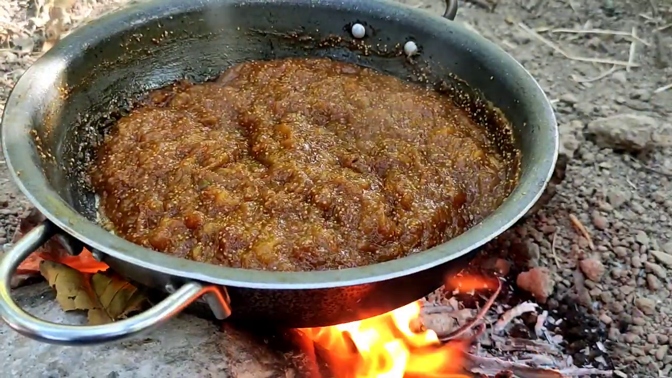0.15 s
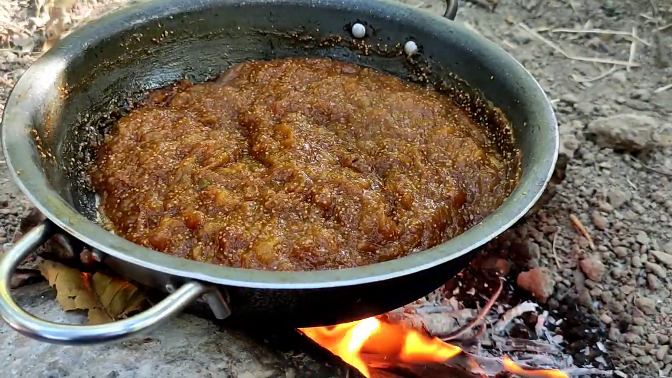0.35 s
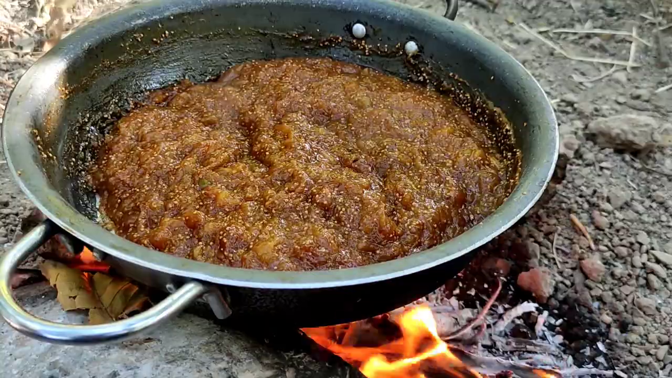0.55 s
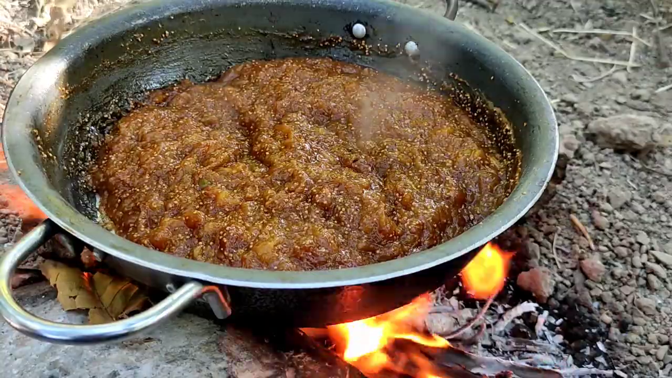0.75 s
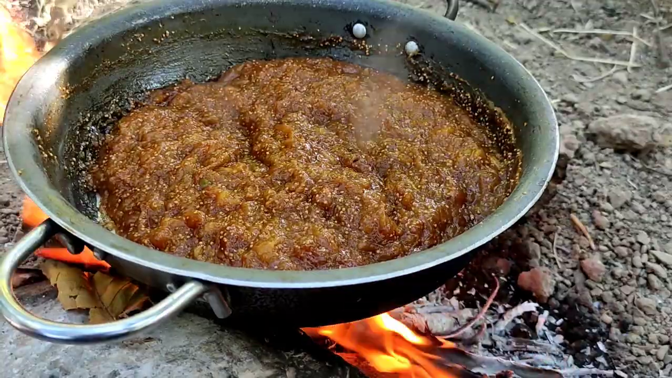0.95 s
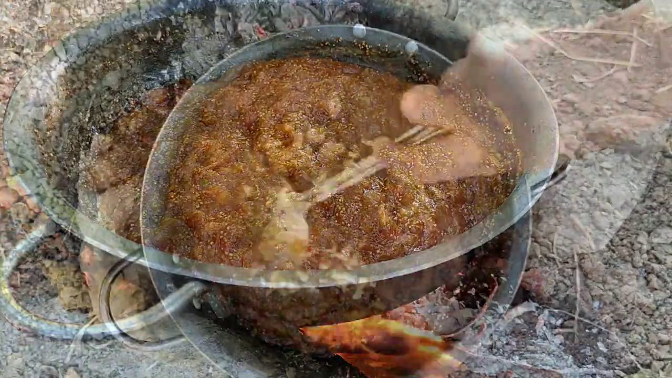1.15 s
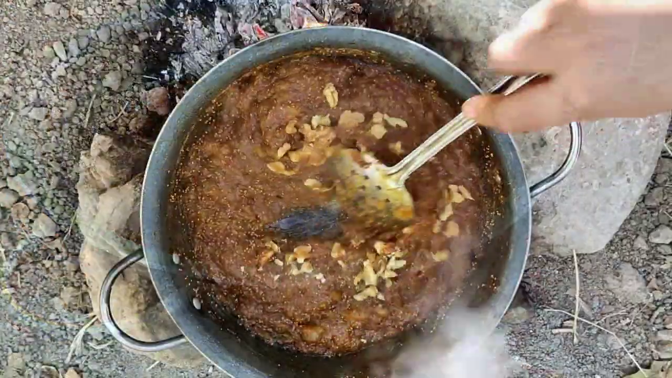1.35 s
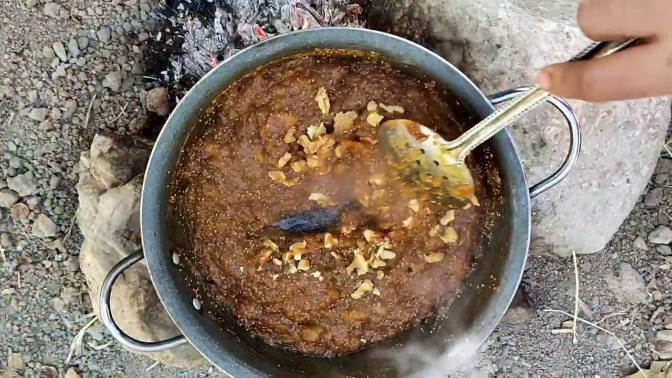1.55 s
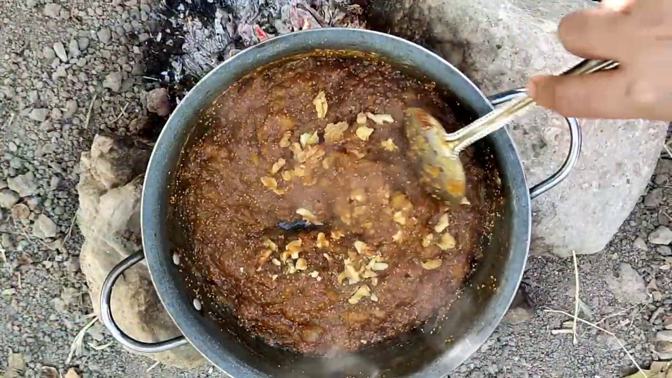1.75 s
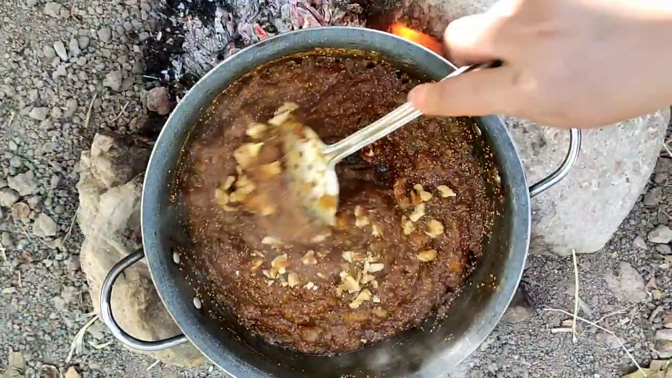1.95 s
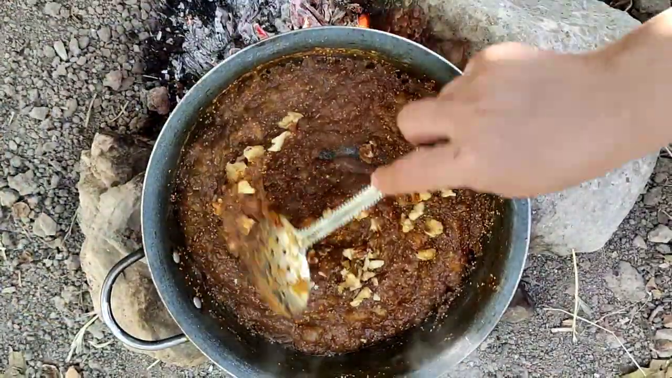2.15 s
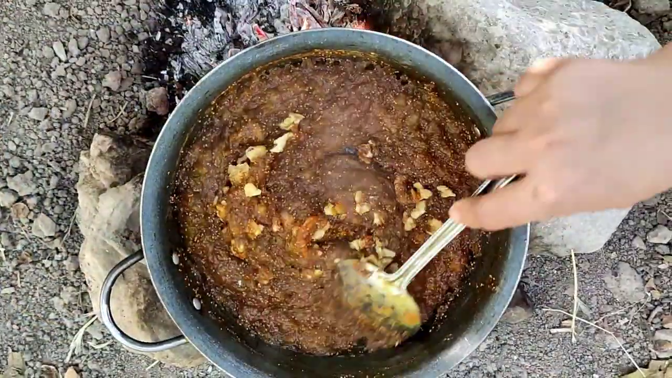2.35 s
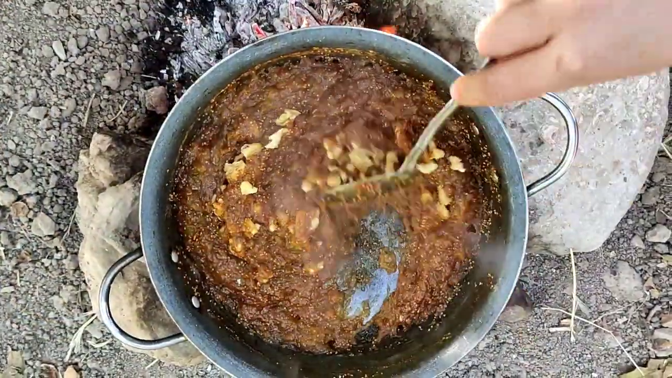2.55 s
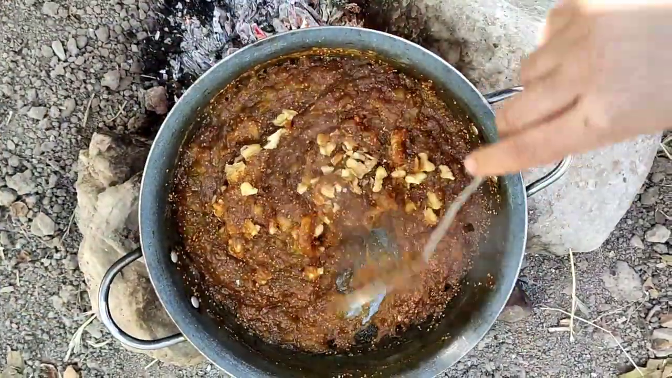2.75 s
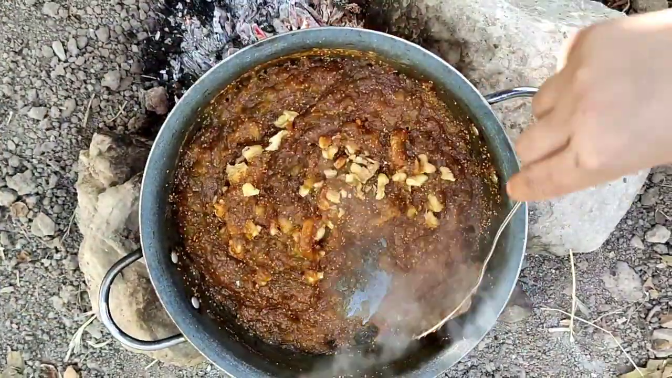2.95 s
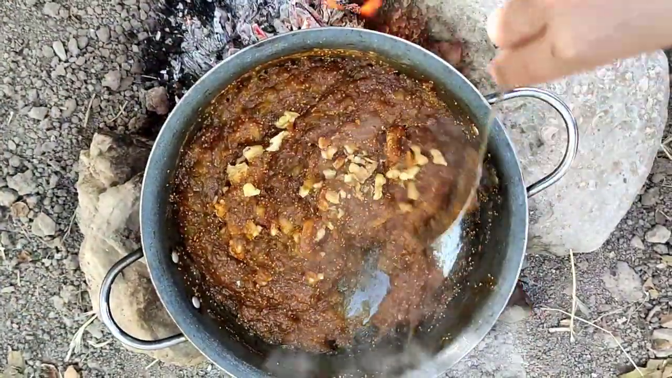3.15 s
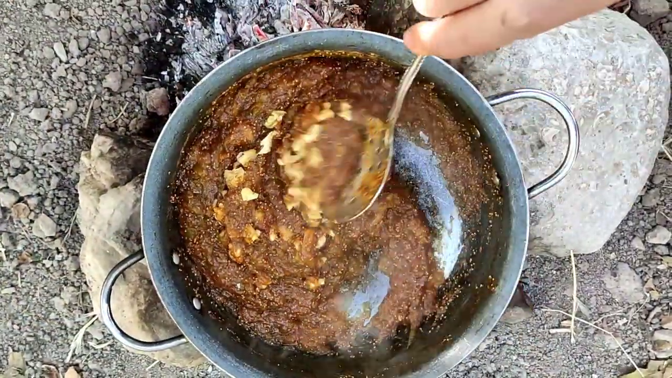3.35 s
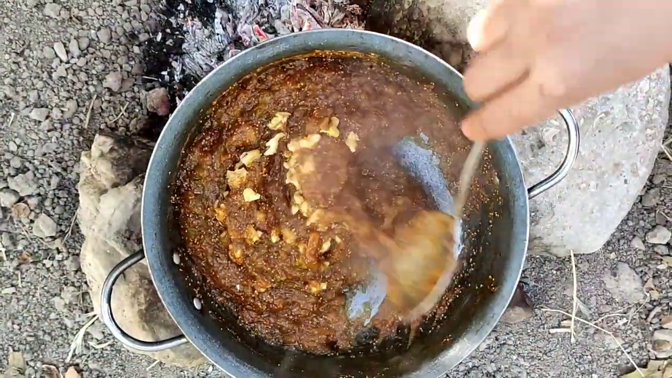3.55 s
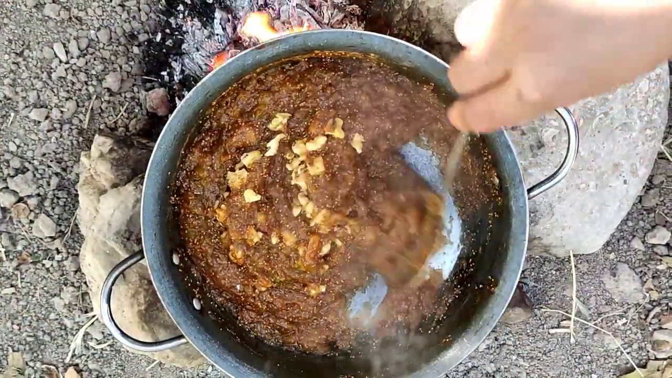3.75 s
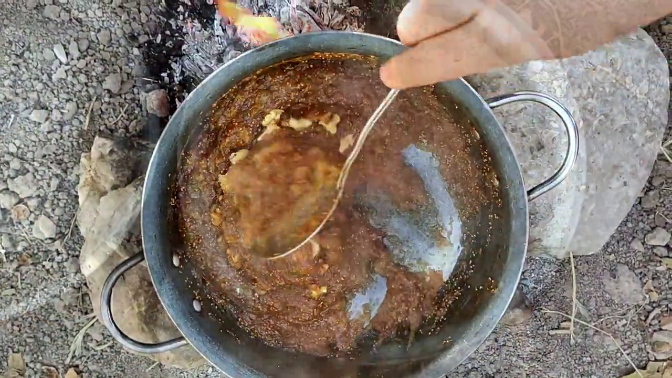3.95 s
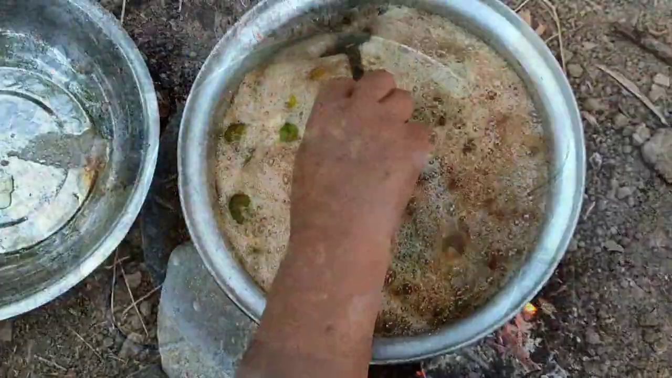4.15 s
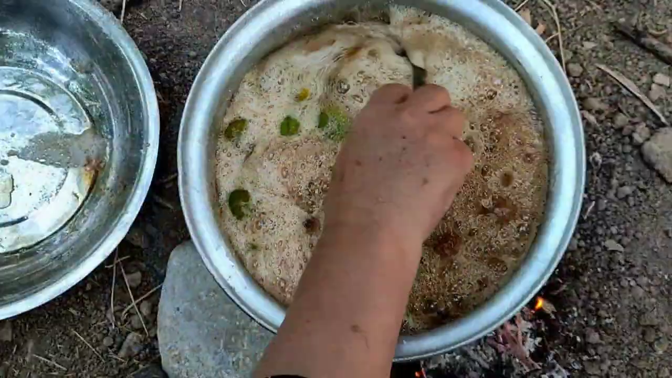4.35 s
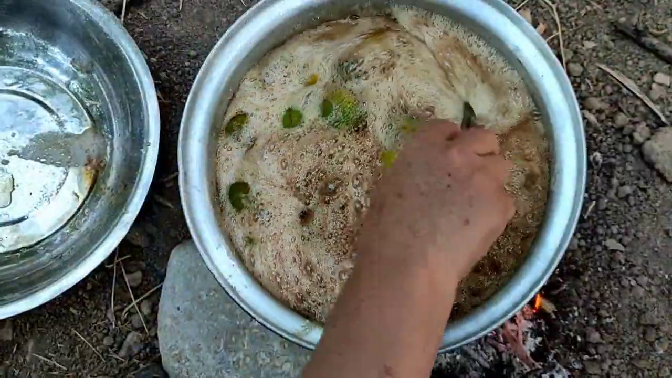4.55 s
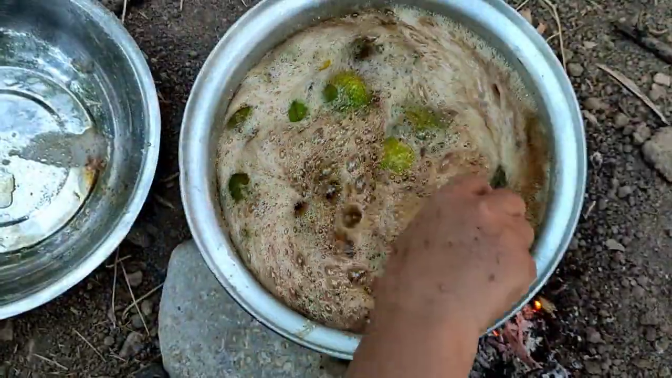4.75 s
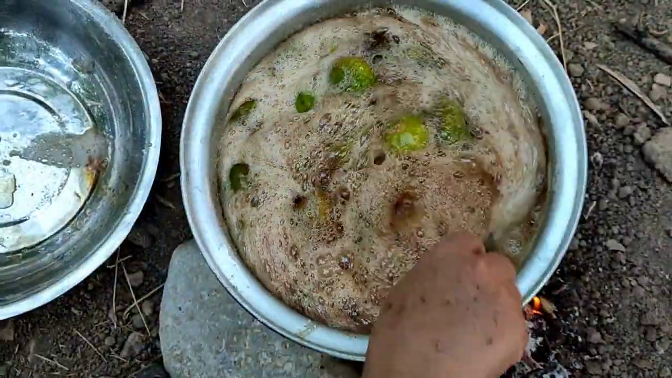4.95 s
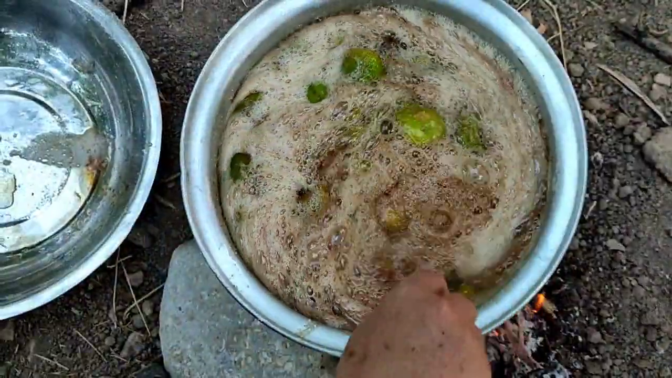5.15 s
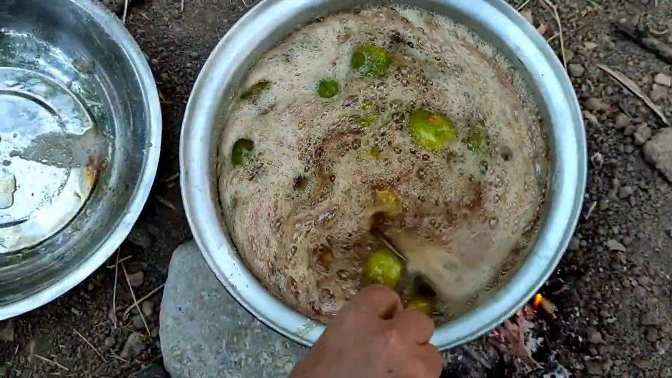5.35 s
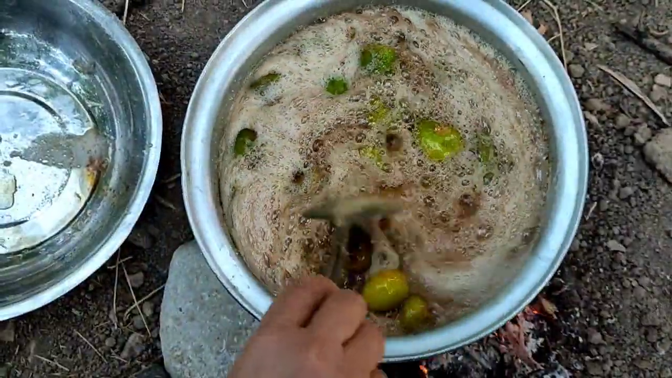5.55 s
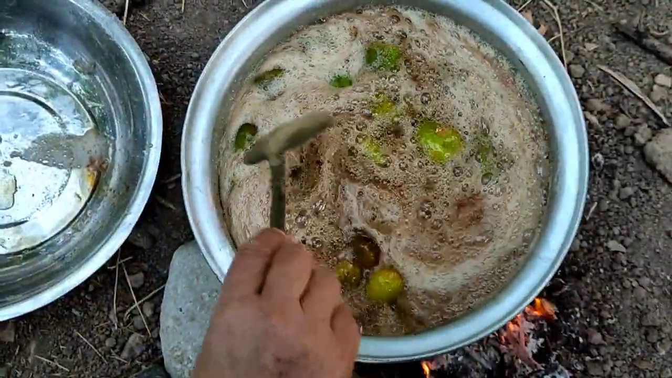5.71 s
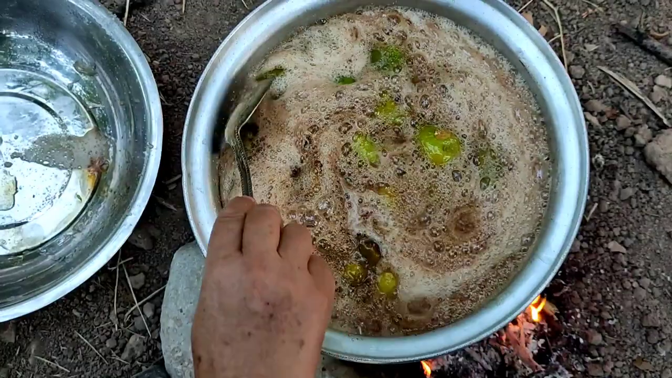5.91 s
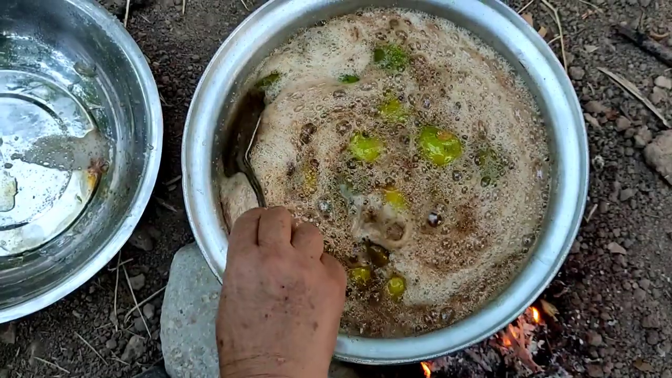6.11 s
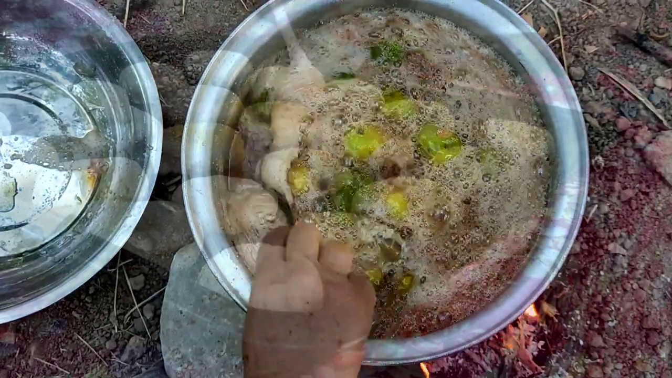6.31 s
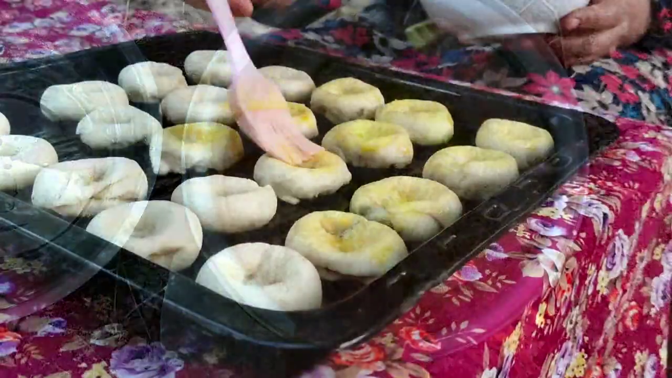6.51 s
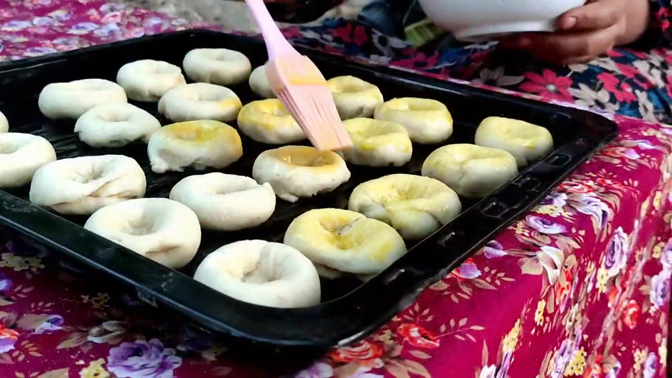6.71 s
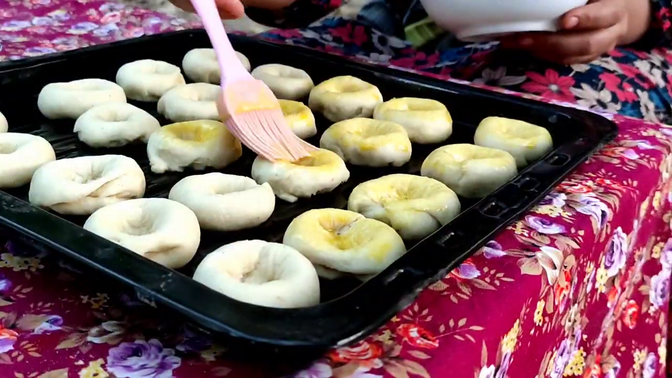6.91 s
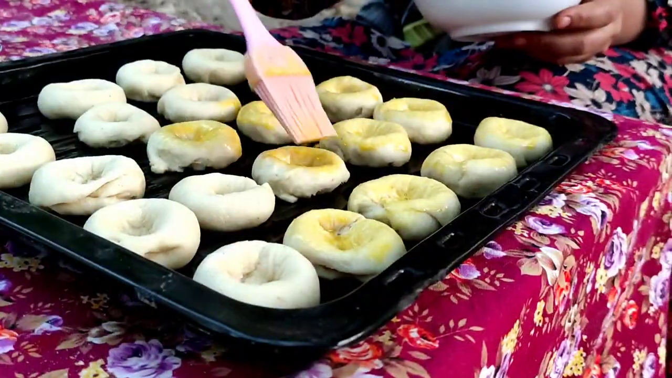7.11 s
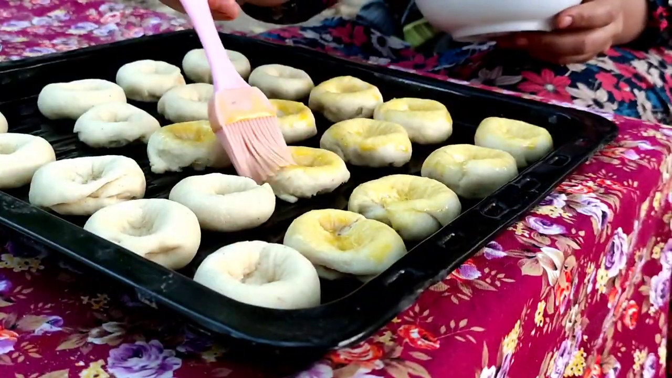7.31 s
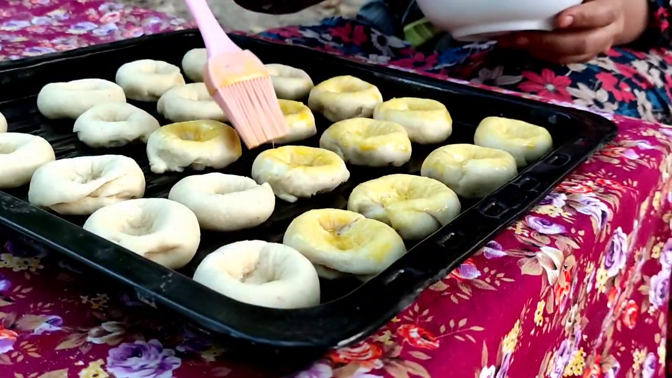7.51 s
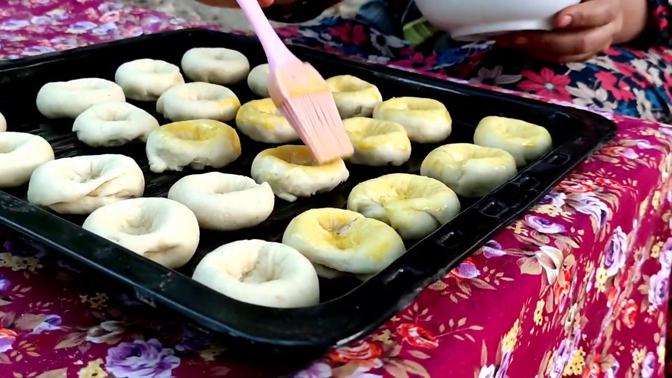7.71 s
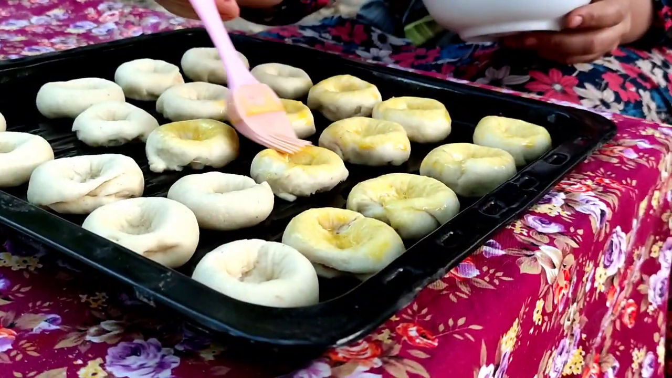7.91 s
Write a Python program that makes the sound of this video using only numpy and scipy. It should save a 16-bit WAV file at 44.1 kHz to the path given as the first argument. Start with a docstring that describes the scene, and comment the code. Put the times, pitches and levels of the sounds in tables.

```python
"""Cooking outdoors over a fluttering wood fire. First, thick jam simmers in a steel pan: it bubbles, plops
and lets off steam while embers crackle. From about 1.2 s it sizzles on the bared metal as a
metal spoon scrapes, knocks and groans through it. From about 4.2 s the spoon stirs a foaming pot of
syrup, rasping and clinking on its wall. From about 6.5 s a soft brush dabs dough on a tray."""
import sys
import numpy as np
from scipy import signal
from scipy.fft import rfft, irfft
from scipy.io import wavfile
from scipy.ndimage import uniform_filter1d, map_coordinates

SR = 44100
rng = np.random.default_rng(int(sys.argv[2]) if len(sys.argv) > 2 else 0)


def unload_wav(signal):
    """Save mono or channel-first audio to the path in sys.argv[1] as 16-bit WAV at rate SR, clipped to [-1, 1]."""
    wavfile.write(
        sys.argv[1],
        SR,
        np.round(np.clip(np.atleast_2d(signal).T, -1, 1) * 32767).astype(np.int16),
    )


N = 355887
TIME = np.arange(N) / SR

# when each job is heard: (start [s], fade-in [s], start of fade-out [s], fade-out [s])
STIRRING = (1.18, 0.22, 3.903, 0.59)
BOILING = (4.15, 0.28, 6.376, 0.31)
BRUSHING = (6.45, 0.097, 8.1, 0.1)
# the pan's modes (its natural notes), damped by the jam: (pitch [Hz], level [dB], ring time [s])
PAN_MODES = [(246, -40.5, 0.13), (371, -13, 0.045), (634, -1, 0.021), (720, -11, 0.043),
             (1065, -19.5, 0.0311), (1287, -11, 0.032), (1600, -31, 0.078)]


def from_db(db):
    """Turn decibels into a factor to multiply by."""
    return 10 ** (np.asarray(db) / 20)


def rms_one(x):
    """Scale a sound so that the average of its channels has an rms (typical size) of 1."""
    return x / np.sqrt(np.mean(np.atleast_2d(x).mean(axis=0) ** 2) + 1e-20)


def at_hz(points, size=4096):
    """Join (frequency, value) points on a log axis and read them at evenly spaced frequencies."""
    hz, value = np.transpose(points)
    return np.interp(np.log(np.linspace(1, SR / 2, size + 1)), np.log(hz), value)


def shape(x, gain):
    """Give each frequency its own gain, with no echo ahead of the sound (a minimum-phase filter)."""
    cepstrum = irfft(np.log(gain + 1e-6))
    half = len(gain) - 1
    cepstrum[1:half] *= 2
    cepstrum[half + 1:] = 0
    response = irfft(np.exp(rfft(cepstrum)))[:half]
    return signal.oaconvolve(np.atleast_2d(x), response[None], axes=1)[:, :N]


def colour(x, spectrum):
    """Set a sound's tone colour from (frequency [Hz], level [dB]) points."""
    return shape(x, from_db(at_hz(spectrum)))


def low_pass(x, hz):
    """Muffle everything above the cut-off frequency."""
    return signal.sosfilt(signal.butter(2, min(hz, .45 * SR), fs=SR, output="sos"), x + 1e-18)


def drift(rate):
    """A curve that glides to a new random value, about 1 in size, `rate` times a second."""
    return np.interp(TIME * rate, np.arange(4000), rng.standard_normal(4000))


def held(start, attack, end, release):
    """A gain that rises from the start, holds at 1 until the end and then falls away."""
    return np.clip(np.minimum((TIME - start) / attack, 1 - (TIME - end) / release), 0, 1)


def spread(pair):
    """Two unrelated signals become stereo, alike in the bass and apart in the treble."""
    # how alike left and right are: (frequency [Hz], likeness [1 = the same])
    likeness = [(50, 0.5), (130, 0.74), (300, 0.72), (700, 0.86), (1400, 0.3), (2800, 0.11), (6000, -0.02),
                (15000, 0)]
    alike = np.clip(at_hz(likeness), -.98, .98)
    middle = shape(pair[0], np.ones_like(alike))
    side = shape(pair[1], np.sqrt((1 - alike) / (1 + alike)))
    return middle + side * [[1], [-1]]


def pan(x, db):
    """Place a sound to the left (positive dB) or right."""
    return x * from_db(np.array([[db], [-db]]) / 2)


def lean(x, side):
    """Share each frequency between left and right."""
    tilt = from_db(at_hz(side))
    right = np.sqrt(2 / (1 + tilt ** 2))
    return np.vstack([shape(x[0], right * tilt), shape(x[1], right)])


def grains(per_s, size_db):
    """Tiny random pops of uneven size, as two unrelated signals."""
    sizes = from_db(size_db * np.minimum(rng.exponential(1, N), 4.5))
    pops = rng.standard_normal((2, N)) * sizes * (rng.random(N) < per_s / SR)
    return pops / (pops.std() + 1e-12)


def hiss(spectrum, grain_db, per_s, size_db, flicker_db, flicker_rate):
    """Countless small pops merge into flickering noise, with nearer ones standing out."""
    source = rng.standard_normal((2, N)) + from_db(grain_db) * grains(per_s, size_db)
    flicker = from_db(flicker_db * drift(flicker_rate))
    return rms_one(colour(spread(source * flicker), spectrum))


def taps(times, db):
    """One tap, a single sample long, at each given time."""
    out = np.zeros(N)
    np.add.at(out, np.round(np.atleast_1d(times) * SR).astype(int), from_db(db))
    return out


def at_random(per_s, db):
    """Taps at random moments."""
    return from_db(db) * (rng.random(N) < per_s / SR)


def ring(force, hz, t60):
    """A force sets one note ringing; t60 is its ring time, the seconds it takes to fade by 60 dB."""
    decay = from_db(-60 / (t60 * SR))
    angle = 2 * np.pi * hz / SR
    return signal.lfilter([.5, 0, -.5], [1, -2 * decay * np.cos(angle), decay * decay], force + 1e-18)


def body(force, modes, pitch=1, tilt_db=0):
    """An object rings in all its modes; the spot that is hit shifts their pitch and balance."""
    pivot_hz = 700
    return sum(from_db(db + tilt_db * np.log2(hz / pivot_hz)) * ring(force, hz * pitch, t60)
               for hz, db, t60 in modes)


def scatter(x, t60, db):
    """Many tiny echoes that die away, different on the left and right."""
    t = TIME[:SR // 3]
    tail = rng.standard_normal((2, len(t))) * from_db(-60 * t / t60)
    tail *= from_db(db) / np.sqrt(np.sum(tail ** 2, axis=1, keepdims=True))
    return signal.oaconvolve(np.atleast_2d(x), tail, axes=1)[:, :N]


def fire(change_s=0.21):
    """Fluttering flames and low outdoor rumble move from one level to the next."""
    # steps in the fire's strength: (start [s], level [dB])
    steps = [(0, -64.5), (0.5, -63.5), (1.0, -67.5), (3.6, -62), (4.15, -69.5), (4.602, -62), (6.52, -70)]
    # the rumble's tone: (frequency [Hz], level [dB])
    tone = [(15, -63), (25, -36.5), (45, -18), (97, 4), (233, 0.5), (339, 1), (403, -7), (479, -8.5),
            (600, -9), (780, -42), (1320, -120)]
    times, db = np.transpose(steps)
    stepped_db = db[np.searchsorted(times[1:], TIME)]
    level = from_db(5 + uniform_filter1d(stepped_db, int(change_s * SR)))
    return level * hiss(tone, grain_db=-7, per_s=100, size_db=2, flicker_db=3, flicker_rate=20)


def simmering_jam():
    """The resting jam bubbles finely and lets off thin jets of steam."""
    # jets of steam: (start [s], end [s], level [dB])
    jets = [(-0.1, 0.242, -56.5), (0.547, 0.78, -55.5), (0.966, 1.15, -57.5)]
    # the bubbles' tone: (frequency [Hz], level [dB])
    bubble_tone = [(210, -11.5), (350, -0.5), (482, -20), (575, -2.5), (754, -1), (1240, -7), (1500, -1),
                   (1680, -11.5), (3560, -10), (5060, -12.5), (5390, -15.5), (6530, -11.5), (7190, -17),
                   (10700, -17.5), (16000, -33)]
    # the steam's tone: (frequency [Hz], level [dB])
    steam_tone = [(5000, -10), (6500, -1.5), (8000, -25), (9500, -6.5), (10700, 2), (12000, -7),
                  (14000, -13), (16000, -24)]
    simmer = from_db(-53) * held(start=-0.1, attack=0.05, end=0.98, release=0.54)
    puffs = sum(from_db(db - 1.5) * held(start, 0.052, end, 0.087) for start, end, db in jets)
    bubbles = hiss(bubble_tone, grain_db=-10.5, per_s=1000, size_db=-2.5, flicker_db=1, flicker_rate=24.8)
    steam = hiss(steam_tone, grain_db=-5, per_s=940, size_db=1.5, flicker_db=3, flicker_rate=50)
    return pan(simmer * bubbles + puffs * steam, db=-2)


def plops(small_per_s=8, low_hz=85.4, high_hz=335, count=6):
    """Each plop in the hot food is a low note that dies within a few cycles."""
    # loud plops of jam and a dab of the brush: (time [s], level [dB], pitch [Hz])
    loud_plops = [(0.393, -40, 197), (0.562, -47.5, 88.8), (0.708, -50, 78), (0.893, -50, 105),
                  (1.762, -44, 176), (2.133, -38.5, 233), (2.601, -42, 237), (2.899, -40.5, 250),
                  (3.219, -34, 336), (3.396, -43, 136), (3.903, -42.5, 122), (7.604, -43, 140)]
    cooking = 1 - held(*BRUSHING)
    loud = [(taps(s, db), hz) for s, db, hz in loud_plops]
    small = [(cooking * at_random(small_per_s / count, db=-49.5), hz)
             for hz in np.geomspace(low_hz, high_hz, count)]
    notes = sum(ring(force, hz, t60=4.7 / hz) for force, hz in loud + small)
    return from_db(4) * low_pass(notes, hz=453)


def crackles():
    """Embers and bursting bubbles snap and echo off nearby stones; faint snaps join as the pot boils."""
    # the loud snaps: (time [s], level [dB])
    loud_snaps = [(0.6804, -18.5), (1.018, -35), (1.105, -27.5), (2.681, -23), (4.363, -31), (4.7672, -31),
                  (4.973, -30.5), (5.0513, -31), (5.108, -27), (5.695, -35), (5.767, -35), (5.8176, -25.5),
                  (6.1399, -29.5), (6.1965, -33.5), (6.236, -39.5), (6.6297, -41.5), (6.835, -40.5)]
    # a snap's tone: (frequency [Hz], level [dB])
    tone = [(300, -26), (1500, -35), (4000, -15.5), (8000, -6), (10800, 0), (13000, 0), (16000, -17)]
    faint = at_random(per_s=6, db=-44 + 2 * rng.standard_normal(N))
    snaps = taps(*np.transpose(loud_snaps)) + held(*BOILING) * faint
    snaps = snaps + scatter(snaps, t60=.008, db=6) + scatter(snaps, t60=.04, db=-9)
    return from_db(6) * colour(snaps, tone)


def efforts(rows, ease_s):
    """Each push of the spoon builds up and eases off; one gain curve per dB column, 1 at rest."""
    rows = np.array(rows)
    swells = np.array([held(s - build, build, s, ease_s) for s, build in rows[:, :2]])
    return from_db(rows[:, 2:].T @ swells)


def steel(x, db):
    """Metal adds its brief high ringing to whatever shakes it."""
    # high notes of bare steel: (pitch [Hz], level [dB], ring time [s])
    modes = [(2424, -5, 0.03), (2815, -8, 0.018), (3226, -2.5, 0.013), (3780, -7, 0.013),
             (4110, -9.5, 0.014), (6277, -9.5, 0.04), (6750, 2, .01), (8100, 5.5, 0.0094),
             (8960, -5, 0.028), (9880, -1, 0.018), (10470, 1.5, 0.018), (11280, -4, .024), (11830, 5, 0.02),
             (12400, -3, 0.024), (13200, -2.5, 0.0088)]
    return x + from_db(db) * body(x, modes)


def wander(x, depth_db, rate, count=6):
    """Patches of sizzle flare up and die down, so each frequency band swells on its own."""
    out, rest = 0, x
    for hz in np.geomspace(2000, 14000, count):
        band = signal.sosfiltfilt(signal.butter(4, hz, fs=SR, output="sos"), rest)
        out = out + band * from_db(depth_db * drift(rate))
        rest = rest - band
    return rms_one(out + rest)


def high_ticks(low_hz=8750, high_hz=14900, count=10, cycles=37):
    """Tiny high ticks at several pitches roughen the sizzle."""
    pops = grains(per_s=420, size_db=2)
    choice = rng.integers(0, count, N)
    pitches = np.geomspace(low_hz, high_hz, count)
    return rms_one(sum(ring(pops * (choice == k), hz, cycles / hz) for k, hz in enumerate(pitches)))


def stirred_jam():
    """Jam sizzles on bared steel while the dragging spoon sticks and slips on the pan."""
    # pushes of the spoon: (peak time [s], build-up [s], extra sizzle [dB], extra drag [dB])
    pushes = [(1.99, 0.59, 4.1, 4.2), (2.59, 0.25, 4.4, 3.7), (3.25, 0.17, 11.7, 1.4), (3.84, 0.11, 5, 1.6)]
    # the sizzle's tone: (frequency [Hz], level [dB])
    tone = [(530, -29), (900, -2), (1030, -4.5), (1340, -1), (1750, -0.5), (1950, -8), (3190, -2),
            (4570, -1.5), (5680, -7.5), (6560, -5), (7140, -14.5), (8660, -4.5), (12000, -1.5), (14900, -8),
            (16000, -8)]
    sizzle, drag = held(*STIRRING) * efforts(pushes, ease_s=0.13)
    frying = hiss(tone, grain_db=-8.5, per_s=1100, size_db=2.5, flicker_db=1.7, flicker_rate=66)
    frying = wander(steel(frying, db=-38), depth_db=3.5, rate=22)
    frying = sizzle * (from_db(-53.5) * frying + from_db(-60) * high_ticks())
    slips = body(spread(grains(per_s=1800, size_db=1.5)), PAN_MODES)
    rubbing = rms_one(colour(slips, [(200, -17.5), (380, -3.5), (650, -2), (1300, -2.5), (3000, -25.5)]))
    return pan(frying, db=-1.5) + pan(from_db(-57) * drag * rubbing + groans(slips), db=0.5)


def hiss_bursts(small_per_s=14, attack_s=0.033, release_s=0.043):
    """Short, narrow bursts of high hiss flicker through the sizzle."""
    # the main bursts: (peak time [s], level [dB], pitch [Hz])
    main_bursts = [(1.37, -56, 9100), (1.43, -58, 12530), (1.56, -51, 13800), (1.78, -64, 12400),
                   (1.895, -49, 9000), (1.95, -52, 14300), (2.06, -48, 12700), (2.27, -59, 9300),
                   (2.61, -46, 9700), (2.87, -55, 12600), (3.41, -63, 10100), (3.629, -50.5, 10600)]
    start, _, end, _ = STIRRING
    small = [(rng.uniform(start, end), rng.uniform(-62.5, -58.5), rng.uniform(8500, 14300))
             for _ in range(int(small_per_s * (end - start)))]
    noise = rng.standard_normal((2, N)) + grains(per_s=1500, size_db=3)
    out = np.zeros((2, N))
    for s, db, hz in main_bursts + small:
        swell = held(s - attack_s, attack_s, s, release_s)
        on = swell > 0
        out[:, on] += from_db(db) * swell[on] * rms_one(ring(noise[:, on], hz, t60=0.0021))
    return out


def off_the_walls(x, swing_share=0.0983):
    """Close echoes shift as the spoon moves, boosting some frequencies and cancelling others."""
    # echoes off the pan's or pot's walls: (delay [s], level [dB])
    echoes = [(0.00095, -5), (0.00175, 2)]
    out = x
    for delay_s, db in echoes:
        earlier = TIME - delay_s * (1 + swing_share * drift(rate=14))
        echo = np.array([map_coordinates(channel, [earlier * SR], order=3) for channel in x])
        out = out + from_db(db) * echo
    return rms_one(out)


def strokes(grit, rows, rise_share=0.34):
    """Each stroke is a swell of fine slips that rises faster than it falls."""
    out = np.zeros((2, N))
    for start, length, db, top_hz in rows:
        progress = np.interp(TIME, [start, start + rise_share * length, start + length], [-1, 0, 1])
        swell = 1 - progress ** 2
        on = swell > 0
        out[:, on] += from_db(db) * low_pass(grit[:, on] * swell[on], top_hz)
    return out


def scrapes(grit, rows, edge_db):
    """The spoon's edge grates over metal; the angle it is held at sets its pitch in each stroke."""
    out = 0
    for *stroke, edge_hz in rows:
        edge = rms_one(ring(grit, edge_hz, t60=0.0038))
        out = out + strokes(grit + from_db(edge_db) * edge, [stroke])
    return out


def pan_scrapes():
    """Coarse slips over the sticky bottom keep the steel ringing; between strokes the spoon glides."""
    # strokes on the pan: (start [s], length [s], level [dB], cut-off [Hz], edge pitch [Hz])
    moves = [(1.48, 0.21, -61, 8330, 3950), (1.95, 0.081, -52, 6000, 2780), (2.024, 0.13, -48, 12000, 4170),
             (2.13, 0.43, -56, 7000, 3670), (2.482, 0.18, -45, 12100, 3450), (2.758, 0.04, -48, 6000, 4220),
             (3.133, 0.21, -43, 10800, 4250), (3.333, 0.056, -44, 18000, 13000),
             (3.59, 0.066, -53, 12000, 4520), (3.805, 0.058, -34, 12100, 3400),
             (3.834, 0.085, -50, 13720, 3270)]
    # the grating's tone: (frequency [Hz], level [dB])
    tone = [(290, -37), (500, -8.5), (678, 9.5), (946, -8.5), (1340, 2), (1650, -2.5), (1950, -10.5),
            (2700, -10), (3300, -9.5), (4300, -9.5), (4900, -7), (5300, -6.5), (6500, -13), (7500, -14.5),
            (9600, -8), (12000, -4.5), (15100, -5.5), (16000, -50)]
    grit = hiss(tone, grain_db=-5, per_s=1500, size_db=2.5, flicker_db=2, flicker_rate=340)
    grit = off_the_walls(steel(grit, db=-27))
    glide = from_db(-60) * held(*STIRRING) * low_pass(grit, hz=6000)
    return scrapes(grit, moves, edge_db=-9) + glide


def rebound(force, delay_s=0.0014, db=-3):
    """A hard contact bounces at once and hits again, more weakly."""
    return force + from_db(db) * np.roll(force, int(delay_s * SR))


def spoon_click(force, tail_db):
    """The hard first contact of metal on metal echoes inside the pan or pot."""
    # the click's tone: (frequency [Hz], level [dB])
    tone = [(60, -33.5), (500, -13.5), (1300, 1), (2200, -32.5), (3100, 3.5), (4200, -0.5), (5700, -5),
            (7000, -1), (8300, -3), (10000, 2), (11900, -4.5), (14000, -5.5), (15000, -7), (16000, -5.5)]
    contact = force + scatter(force, t60=0.004, db=2) + scatter(force, t60=.11, db=tail_db)
    return colour(from_db(-2.5) * steel(contact, db=-36), tone)


def pan_knocks():
    """The jam cushions each blow and damps the pan to a short clonk; hard blows make the steel clank."""
    # spoon blows: (time [s], thud [dB], click [dB], clank [dB], thud cut-off [Hz],
    # thud pitch [factor], thud tilt [dB per octave])
    blows = [(1.768, -44, -42, -46, 1100, 0.92, 2), (1.8494, -18.5, -20.5, -36, 750, 1.095, 5),
             (1.881, -36, -43, -46, 1100, 1.12, 2), (1.9443, -36.5, -40, -46, 1100, 0.99, 6),
             (2.158, -41, -42, -46, 1200, 1.08, -2), (2.3697, -36, -34, -40, 1490, 1.14, 2),
             (2.58, -35, -36, -42, 1100, 0.93, -5), (2.8797, -38, -40, -44, 1300, 0.98, 2),
             (3.0551, -11.5, -5, -27, 860, 1.023, 0.5), (3.108, -32.5, -43, -40, 900, 1.0, -5),
             (3.342, -39, -35, -30, 2000, 1.03, -2), (3.667, -38.5, -43, -46, 1200, 0.94, 1),
             (3.7542, -12, -12.5, 3.5, 1500, 1.054, -1.5)]
    # notes of the clank: (pitch [Hz], level [dB], ring time [s])
    clank_modes = [(1356, -19, 0.014), (1657, -27.5, 0.019), (3020, -26.5, 0.011), (3400, -28.5, 0.006),
                   (3830, -31.5, 0.0094), (6730, -32, 0.015), (7920, -29, 0.0105), (10000, -22.5, 0.0096),
                   (10500, -21.5, 0.0077), (11760, -21, 0.008), (12220, -25, 0.007), (13220, -28.5, 0.008)]
    thud = sum(body(low_pass(taps(s, db), hz), PAN_MODES, pitch, tilt)
               for s, db, _, _, hz, pitch, tilt in blows)
    times, _, click_db, clank_db, *_ = np.transpose(blows)
    clank = body(rebound(taps(times, clank_db)), clank_modes)
    clank = clank + scatter(clank, t60=0.006, db=-7)
    thud = thud + scatter(thud, t60=0.083, db=-15)
    return thud + clank + spoon_click(rebound(taps(times, click_db)), tail_db=-8.5)


def groans(slips, start_hz=431, sag_hz_per_s=500, waver_share=0.0268):
    """Pushed hard, the spoon's slips lock into a rough, wavering note that sags as the spoon slows."""
    # hard pushes along the pan's bottom: (start [s], end [s], level [dB])
    pushes = [(2.557, 2.581, -61), (3.078, 3.2, -42.5), (3.8, 3.84, -59)]
    # the note's harmonics: (multiple of the pitch [factor], level [dB])
    harmonics = [(1, -0.5), (2, -1), (3, -15), (4, -27.5)]
    # under pressure the slips shake the pan's lowest notes
    judder_tone = [(150, -11), (360, 2.5), (480, 1.5), (750, -4.5), (1300, -10), (3000, -27)]
    judder = rms_one(colour(slips, judder_tone))
    out = 0
    for start, end, db in pushes:
        hz = (start_hz - sag_hz_per_s * (TIME - start)) * (1 + waver_share * drift(rate=90))
        phase = 2 * np.pi * np.cumsum(hz) / SR
        note = sum(from_db(harmonic_db) * np.sin(k * phase) for k, harmonic_db in harmonics)
        swell = from_db(db) * held(start, 0.032, end, 0.091)
        out = out + swell * (from_db(-1) * judder + from_db(-1.5) * note)
    return out


def foaming_pot():
    """Foam fizzes steadily while each sweep of the spoon churns the syrup harder."""
    # sweeps of the spoon: (peak time [s], build-up [s], extra churning [dB])
    sweeps = [(4.38, 0.29, 10.6), (5.07, 0.4, 11), (6.15, 0.3, 3.1)]
    # the foam's tone: (frequency [Hz], level [dB])
    foam_tone = [(260, -25), (450, -10), (818, -3), (1860, -12), (3230, -11), (3990, -12), (4630, -11.5),
                 (5620, -16.5), (6630, -15), (9070, -16), (12000, -17), (15100, -18), (16000, -29)]
    # the syrup's low tone: (frequency [Hz], level [dB])
    churn_tone = [(120, -10), (230, 3), (340, 4), (430, 2.5), (520, -35), (700, 2), (1500, -50)]
    churn, = efforts(sweeps, ease_s=0.31)
    fizz = hiss(foam_tone, grain_db=-7, per_s=600, size_db=1.5, flicker_db=1.1, flicker_rate=45)
    gurgle = hiss(churn_tone, grain_db=6, per_s=170, size_db=1, flicker_db=0.5, flicker_rate=17)
    return held(*BOILING) * (pan(from_db(-62.3) * fizz, db=-2) + from_db(-67.5) * churn * gurgle)


def pot_knocks():
    """The struck pot thuds and its wall rings hollow; the loosely held spoon clinks against it."""
    # spoon blows: (time [s], thud [dB], wall ring [dB], click [dB], thud pitch [factor],
    # wall pitch [factor], cut-off [Hz])
    blows = [(4.347, -49, -43.5, -50, 1.14, 0.62, 1500), (4.571, -32.5, -38, -28, 1.2, 1.1, 2500),
             (4.685, -46.5, -43.5, -39, 0.92, 0.84, 2500), (4.767, -47, -46, -31, 1.0, 0.95, 3000),
             (5.079, -40, -47, -40, 0.65, 1.1, 2200), (5.334, -26, -25.5, -3, 0.93, 1.06, 3470),
             (5.5954, -42, -48, -54, 1.06, 0.84, 1500), (5.9327, -21.5, -21, -10.5, 1.17, 0.84, 1800),
             (6.3292, -29, -39, -35, 0.8, 0.94, 1900), (6.556, -43.5, -44.5, -44, 1.03, 0.8, 2220),
             (6.643, -56, -50, -51, 0.66, 0.75, 2000)]
    # clinks of the loose spoon: (time [s], click [dB], spoon ring [dB])
    clinks = [(5.9314, -23, -21), (5.9751, -26, -39), (5.98, -28, -45), (6.0092, -22, -48),
              (6.0295, -18, -45)]
    # notes of the whole pot with its syrup: (pitch [Hz], level [dB], ring time [s])
    pot_modes = [(203, -10, 0.033), (260, -15.5, 0.037), (350, -6, 0.043)]
    # notes of its thin wall: (pitch [Hz], level [dB], ring time [s])
    wall_modes = [(782, -5, 0.019), (900, -9.5, 0.013), (1350, -21.5, 0.013), (1790, -16, 0.0089),
                  (3000, -11.5, 0.0098), (4230, -0.5, 0.01)]
    # notes of the spoon: (pitch [Hz], level [dB], ring time [s])
    spoon_modes = [(2800, -16, 0.026), (3430, -4, 0.01), (4600, -9, 0.01), (5305, -7.5, 0.073),
                   (5322, -5, 0.091), (5660, -29, 0.02), (6450, -6, 0.0057)]
    # the wall's tick, thinner than the pan's: (frequency [Hz], level [dB])
    tick_tone = [(700, -14), (1500, -4), (2400, 3), (3200, -7.5), (4400, -4), (5600, -10), (7000, 2),
                 (9000, 2), (13000, 1)]
    thud = 0
    for s, thud_db, wall_db, _, thud_pitch, wall_pitch, top_hz in blows:
        pot = body(taps(s, thud_db), pot_modes, thud_pitch)
        wall = body(taps(s, wall_db), wall_modes, wall_pitch)
        thud = thud + low_pass(pot + wall, top_hz)
    clink_times, tick_db, ring_db = np.transpose(clinks)
    chatter = from_db(2.5 * drift(rate=450))  # the ringing spoon keeps brushing the wall
    note = chatter * body(taps(clink_times, ring_db), spoon_modes)
    clink = pan(note + scatter(note, t60=.03, db=-10), db=-7)
    times, _, _, click_db, *_ = np.transpose(blows)
    contacts = colour(rebound(taps(times, click_db)) + taps(clink_times, tick_db), tick_tone)
    return thud + scatter(thud, t60=0.05, db=-10) + spoon_click(contacts, tail_db=-5) + clink


def pot_scrapes():
    """On the pot's wet wall the spoon gives a finer, thinner rasp, and glides between strokes."""
    # strokes on the pot: (start [s], length [s], level [dB], cut-off [Hz], edge pitch [Hz])
    moves = [(4.392, 0.046, -61, 7000, 6300), (4.527, 0.033, -55, 14000, 5600),
             (4.744, 0.055, -50, 10090, 4930), (4.782, 0.18, -55, 8450, 4930),
             (5.459, 0.02, -58.5, 12000, 6500), (5.928, 0.084, -52, 10000, 5400),
             (5.968, 0.02, -44.5, 14000, 5400), (6.017, 0.099, -51, 13100, 6360),
             (6.191, 0.019, -61, 14000, 6170), (6.229, 0.014, -57, 14000, 6200),
             (6.316, 0.12, -51.5, 13000, 6450)]
    # the rasp's tone: (frequency [Hz], level [dB])
    tone = [(300, -23), (800, 1.5), (1300, -5.5), (1900, -4.5), (2500, -5), (3700, -1), (4700, -4),
            (6500, -2), (9000, -1), (11000, 1), (14500, 2.5), (16000, -8)]
    grit = hiss(tone, grain_db=-6.5, per_s=1200, size_db=1.5, flicker_db=3, flicker_rate=290)
    grit = off_the_walls(grit)
    glide = from_db(-64) * held(*BOILING) * low_pass(grit, hz=6500)
    return scrapes(grit, moves, edge_db=-12) + glide


def brush():
    """Wet bristles whisper over the dough, with a few single strokes standing out."""
    # strokes of the brush: (start [s], length [s], level [dB], cut-off [Hz])
    dabs = [(6.984, 0.075, -66, 12000), (7.542, 0.19, -45.5, 2680), (7.757, 0.1, -61, 13900),
            (7.993, 0.17, -53.5, 3970)]
    # the whisper's tone: (frequency [Hz], level [dB])
    tone = [(260, -32), (450, 0), (580, -15), (684, -4), (1120, -8.5), (1440, -10.5), (3430, -15.5),
            (4110, -16.5), (6150, -19), (8170, -17.5), (16000, -25.5)]
    bristle_tone = [(40, -22), (130, 4), (260, 6.5), (600, -2.5), (1500, -9), (5000, -2.5),
                    (10000, 6.5), (16000, -1)]
    whisper = hiss(tone, grain_db=-16, per_s=520, size_db=-4, flicker_db=1.5, flicker_rate=43)
    bristles = hiss(bristle_tone, grain_db=-6, per_s=860, size_db=2.5, flicker_db=1, flicker_rate=68)
    return from_db(-67) * held(*BRUSHING) * whisper + strokes(bristles, dabs)


def scene():
    """All the sounds add up in the open air, with pan and pot each in its own direction."""
    # the pan's direction: (frequency [Hz], left minus right [dB])
    pan_side = [(1500, -2), (3200, -5), (6000, 3), (9000, 2), (13000, 8.5)]
    # the pot's direction: (frequency [Hz], left minus right [dB])
    pot_side = [(1500, 0), (3200, 0.5), (6000, -8), (9000, -3), (13000, 8)]
    jam_pan = lean(stirred_jam() + hiss_bursts() + pan_knocks() + pan_scrapes(), pan_side)
    pot = lean(foaming_pot() + pot_knocks() + pot_scrapes(), pot_side)
    return fire() + crackles() + simmering_jam() + plops() + jam_pan + pot + brush()


def record(dry, peak_limit=1.1, cutoff_hz=15900):
    """The microphone's left side hears more treble; hard peaks are rounded and the very top is cut."""
    # the microphone's balance: (frequency [Hz], left minus right [dB])
    balance = [(60, 3), (200, -0.5), (700, 2), (1300, 2), (2400, -2.5), (4400, 5.5), (8000, -1.5),
               (11500, 14.5), (15000, -4)]
    rounded = peak_limit * np.tanh(lean(dry, balance) / peak_limit)
    return signal.sosfilt(signal.ellip(10, .1, 80, cutoff_hz, fs=SR, output="sos"), rounded)


dry = scene()
out = record(dry)
unload_wav(out)
```